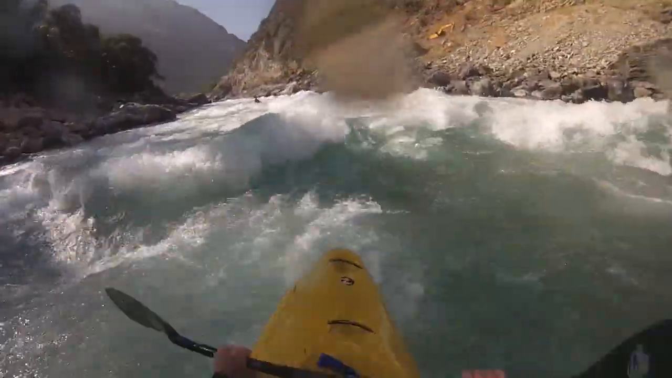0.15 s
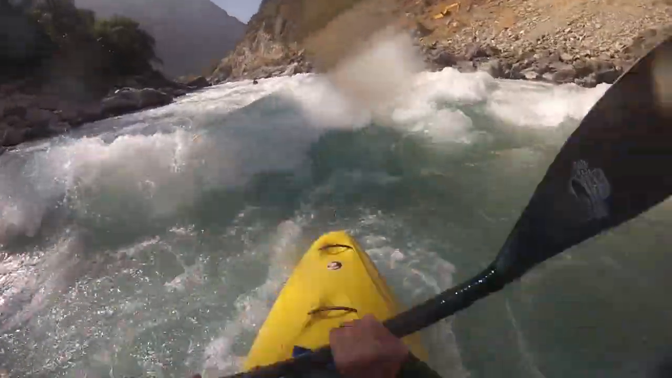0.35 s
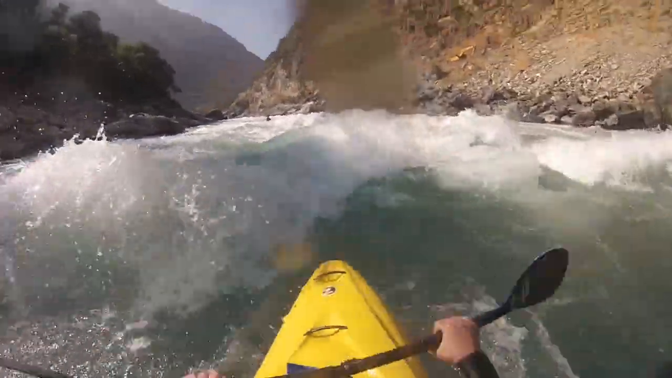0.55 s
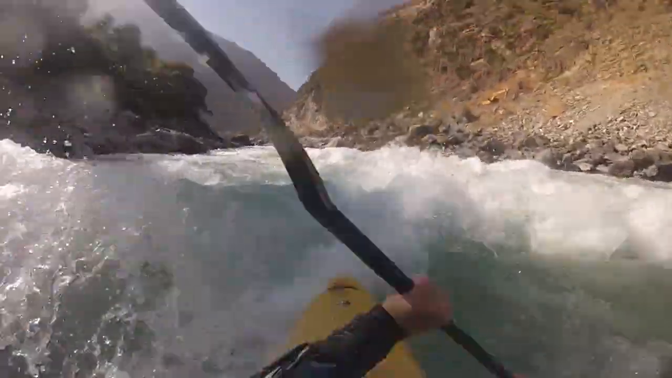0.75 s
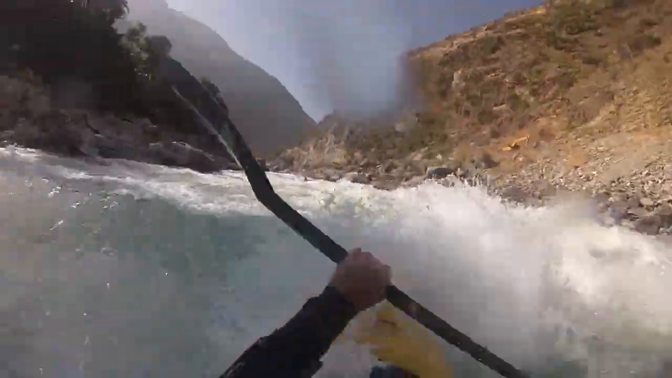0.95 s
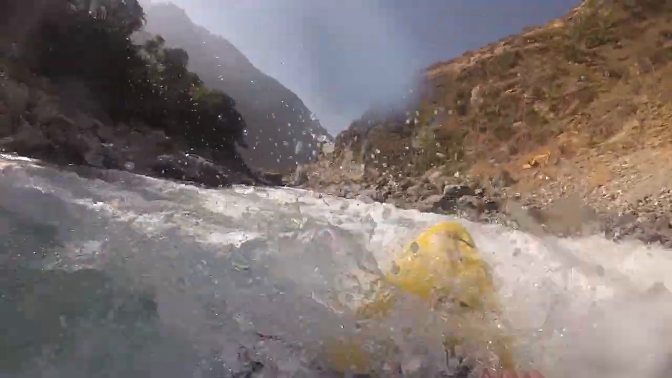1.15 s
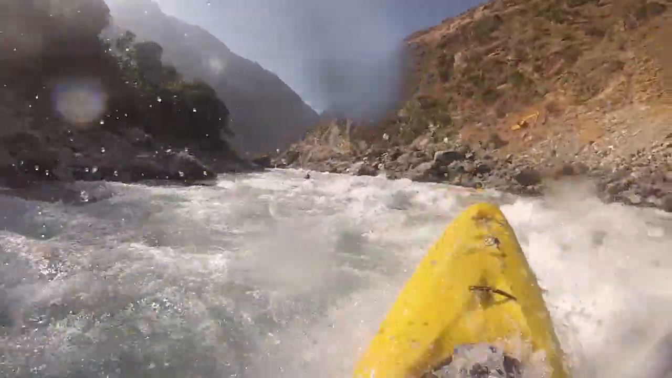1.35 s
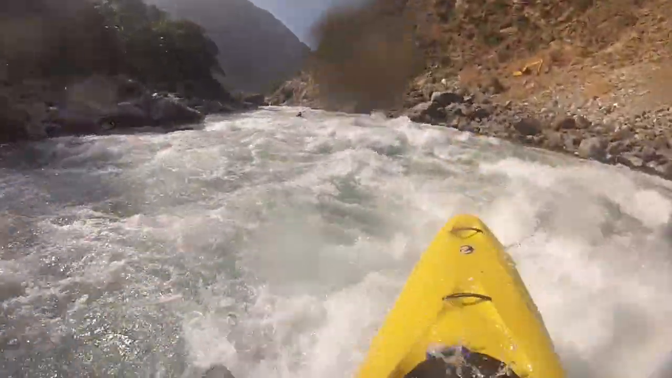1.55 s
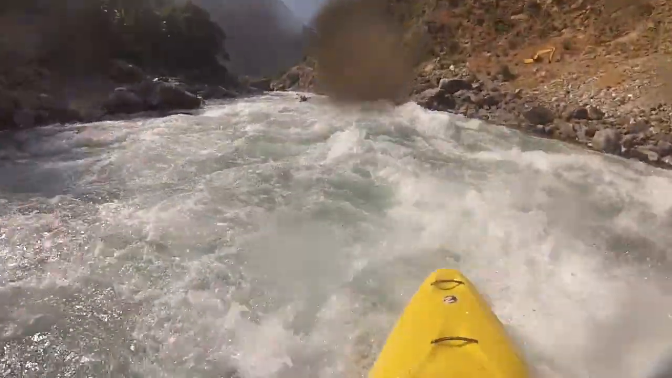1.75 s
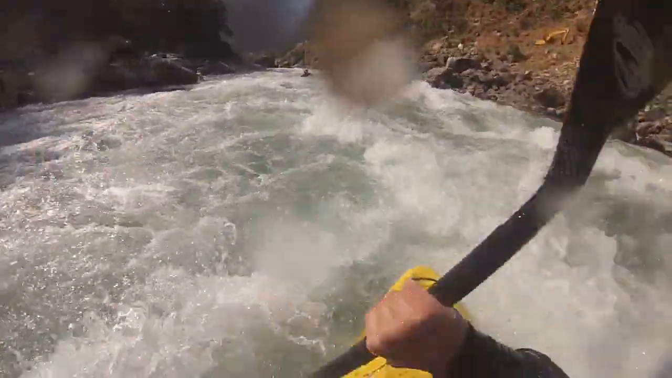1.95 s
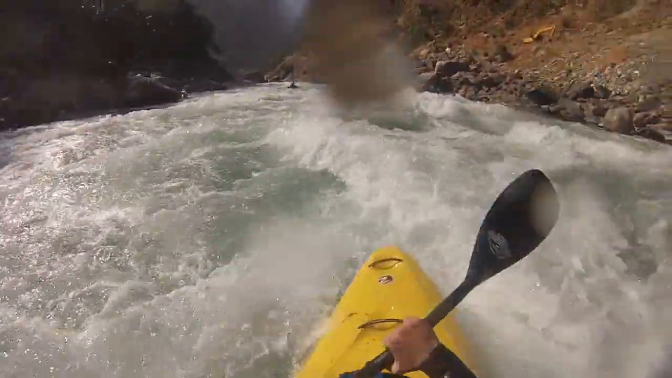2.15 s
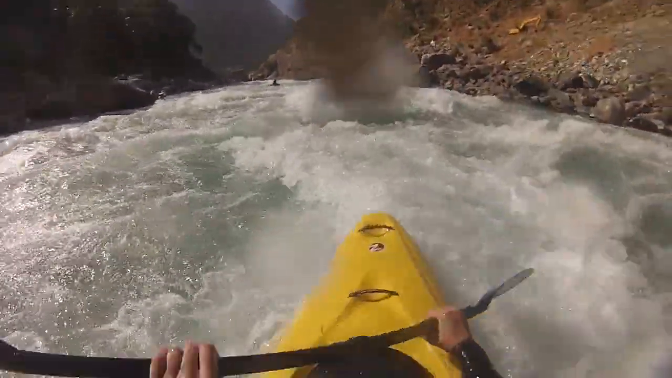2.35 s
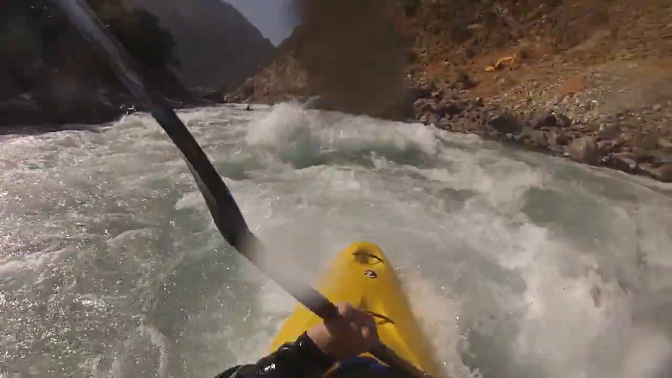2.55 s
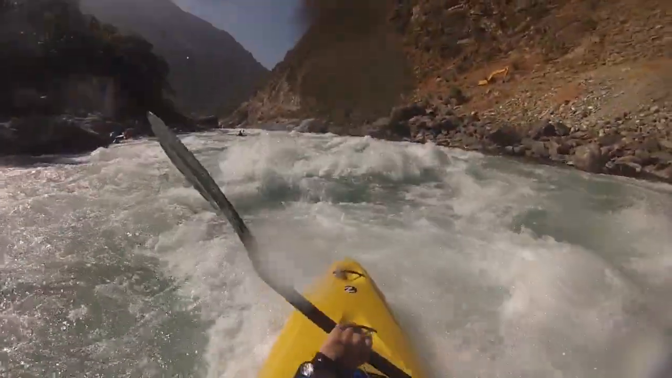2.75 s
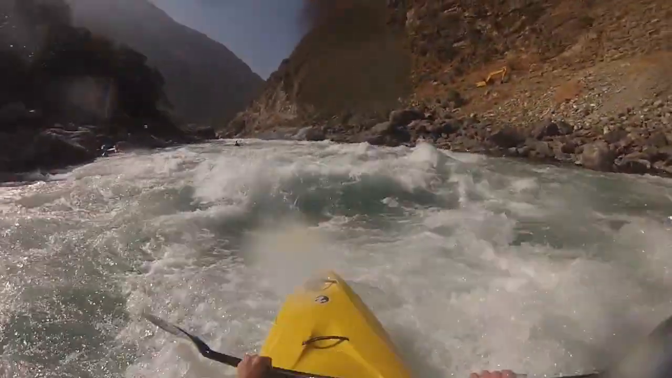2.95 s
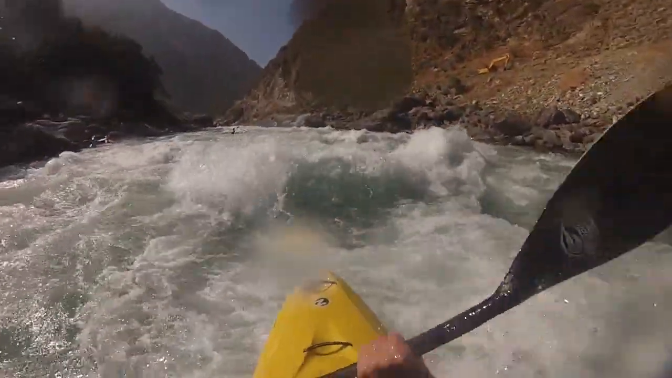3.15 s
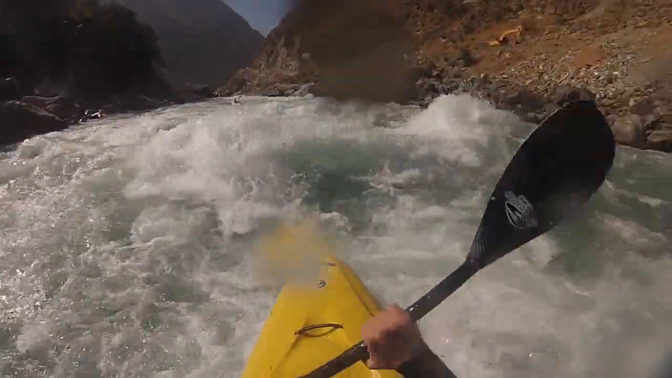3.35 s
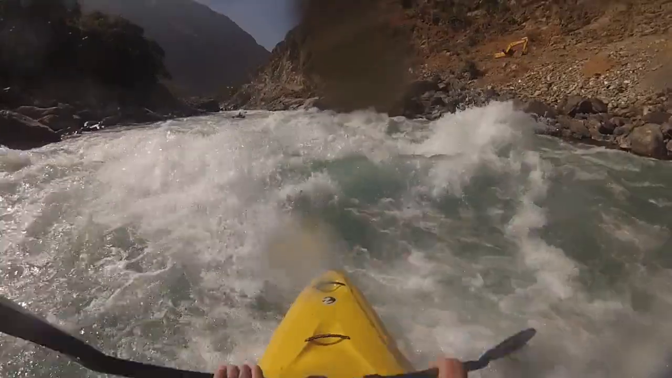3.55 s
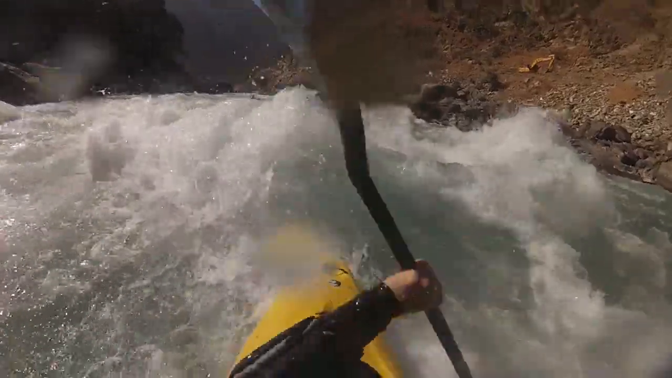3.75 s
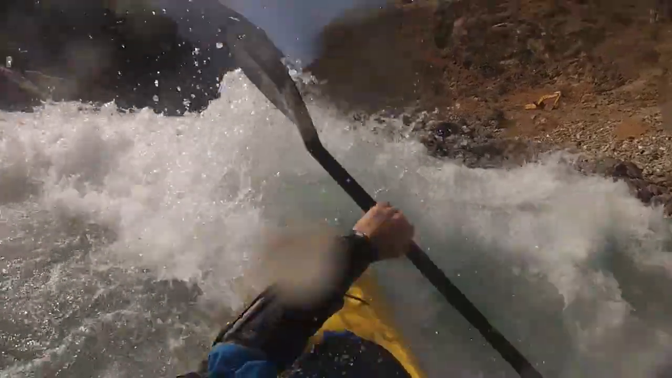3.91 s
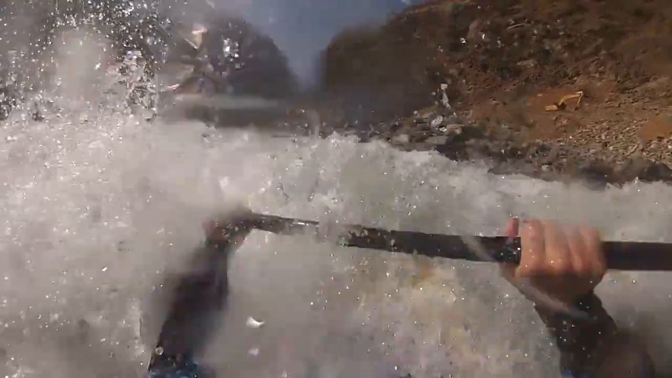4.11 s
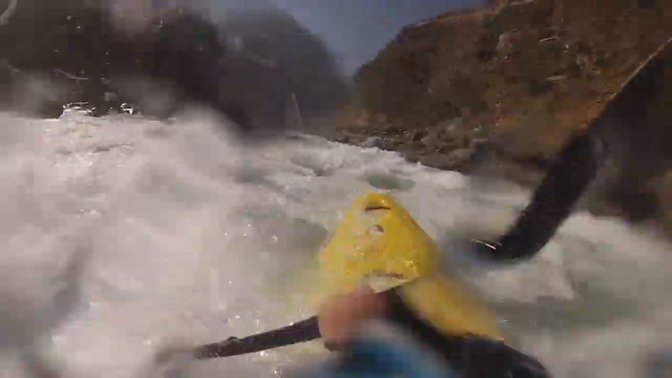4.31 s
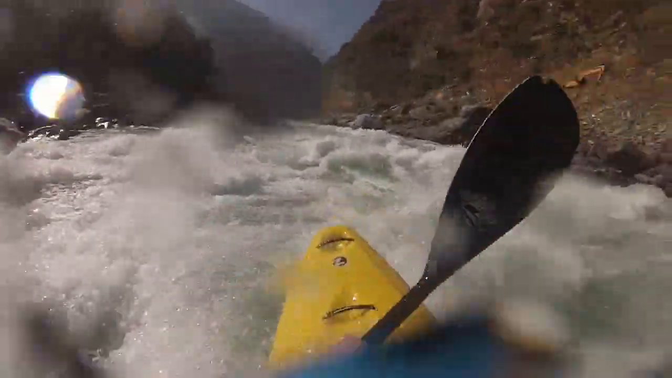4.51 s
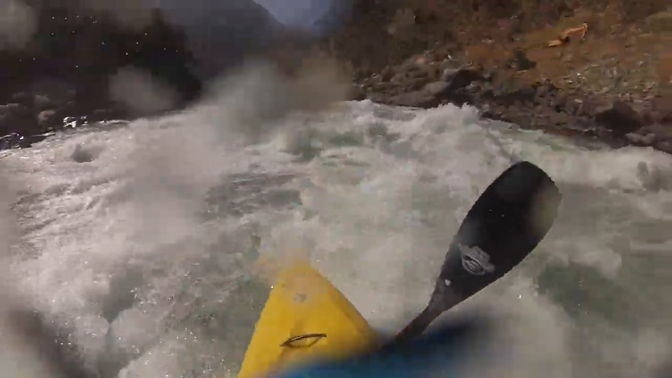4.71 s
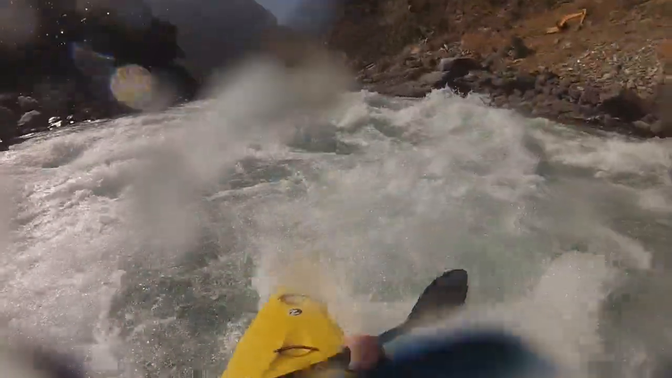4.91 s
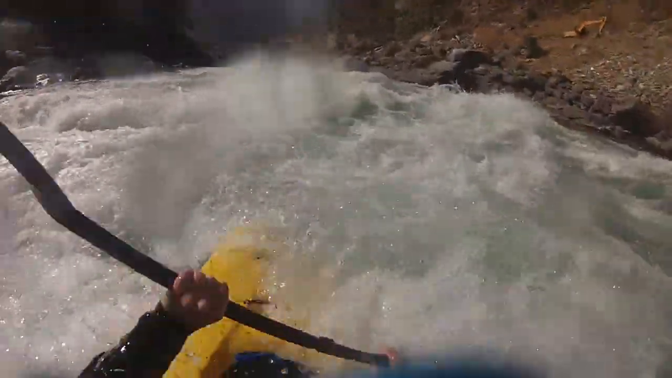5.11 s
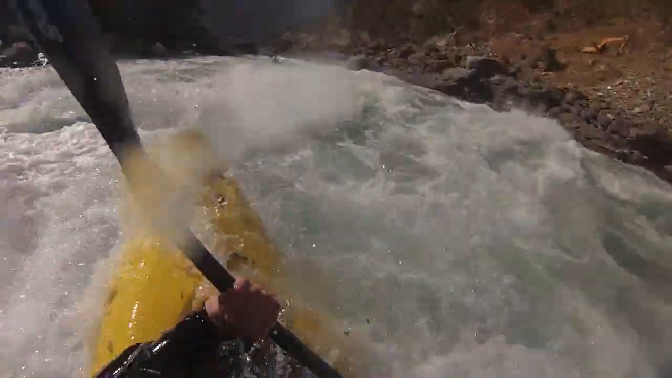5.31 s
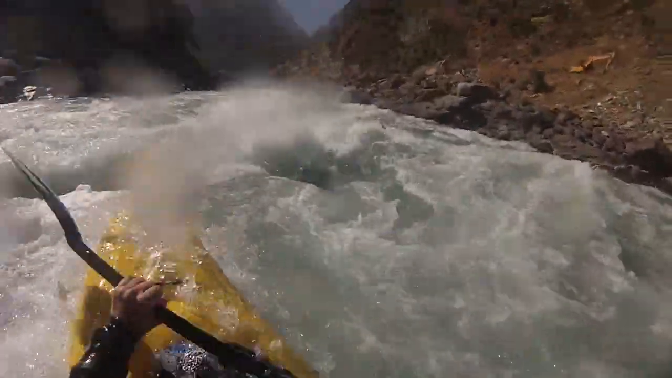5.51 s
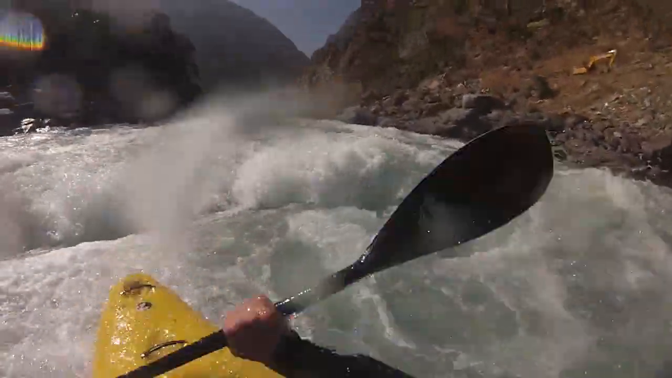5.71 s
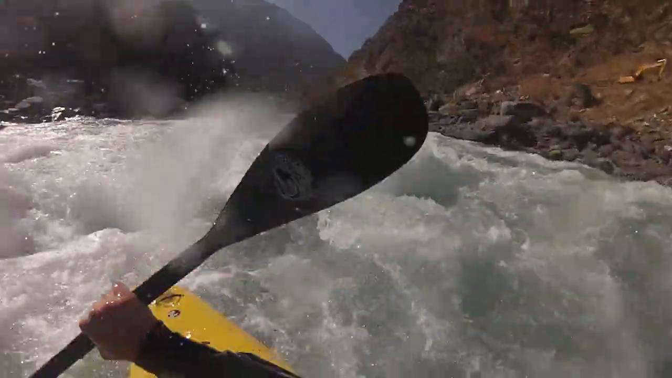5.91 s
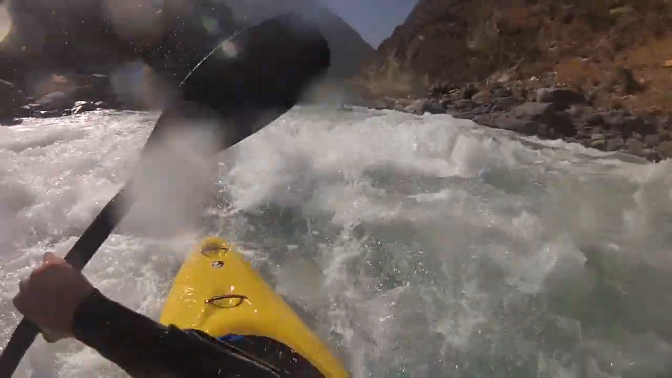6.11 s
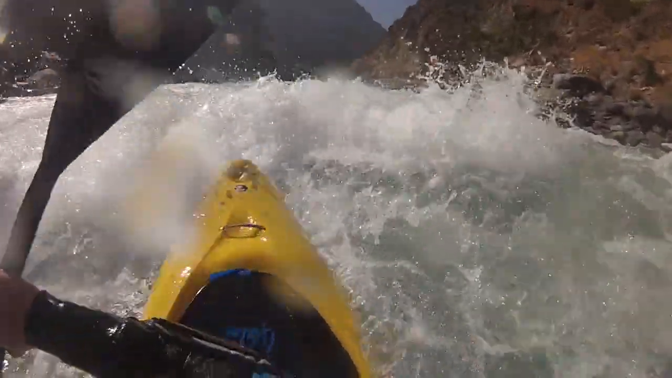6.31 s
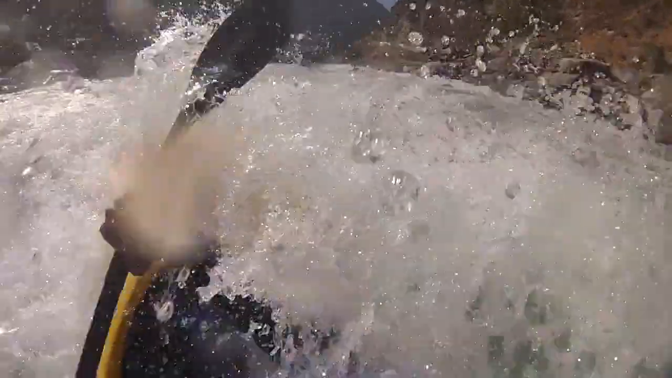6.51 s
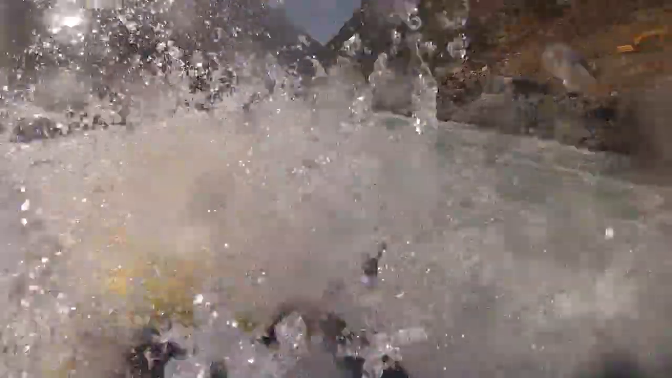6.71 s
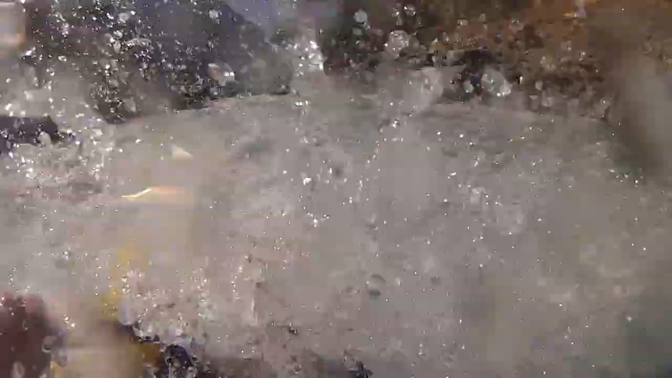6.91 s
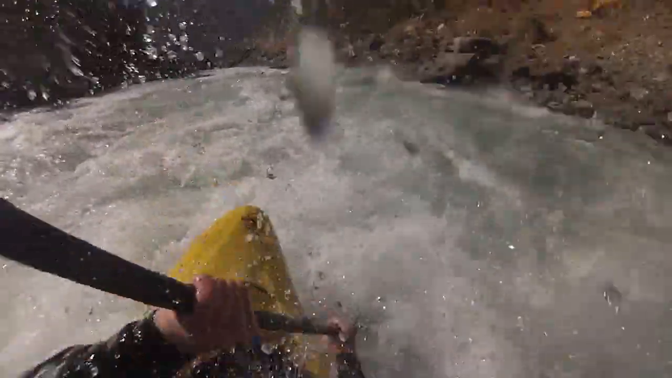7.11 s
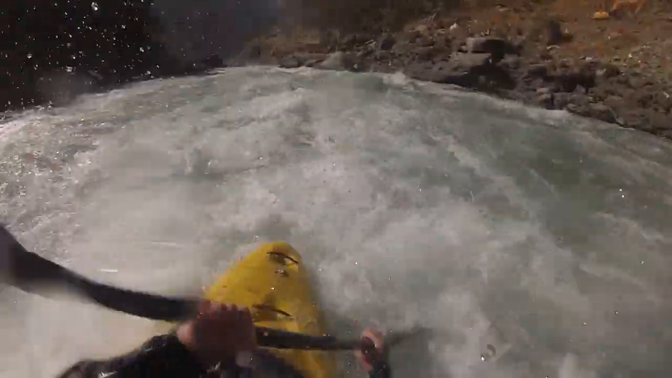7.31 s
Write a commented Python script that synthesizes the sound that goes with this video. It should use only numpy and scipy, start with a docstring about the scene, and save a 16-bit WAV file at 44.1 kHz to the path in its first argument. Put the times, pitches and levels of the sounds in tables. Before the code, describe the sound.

Whitewater in a gorge, heard inside a small plastic waterproof housing on a kayaker, so the river sounds boxy and coloured by the shell, alike in both channels. A continuous bubbly rush swells at about 0.6 seconds, then foam hisses and low buffeting pushes around 0.8-1.1, with a few drops ticking and soft thuds at 1.1 and 1.3. The wake gurgles and the river settles through 2-3 seconds, swelling mildly near 3.5, with a light tap at 3.7. The roar builds strongly to 4.25, where a quick cluster of sharp cracks, spray patter and thumps strikes at 4.15-4.4. Gurgling fades through 5-6 with sparse faint drops. Another wave rises to the hardest smack at 6.6, with deep thumps, followed by isolated drops and a second crisp burst at 7.02-7.05. Foamy rush and wake continue, with one last tick at 7.3.

```python
"""A whitewater river roars and fizzes, swelling as each wave nears and gurgling in its wake; spray patters,
big drops crack and slabs of water thump: a kayak in a gorge, heard inside a small waterproof camera housing.
The river is noise, bubbles and clicks, coloured by the plastic shell and swelled wave by wave.
Drops and spray strike a set of decaying shell resonances; thumps are low sines that die away quickly.
Low noise pushes on the housing in lumps."""
import sys
import numpy as np
from scipy import signal
from scipy.fft import rfft, irfft
from scipy.io import wavfile

SR = 44100
rng = np.random.default_rng(int(sys.argv[2]) if len(sys.argv) > 2 else 0)


def dump(signal):
    """Clip the signal to [-1, 1] and save it as 16-bit WAV at the path in sys.argv[1]."""
    limited = np.clip(np.atleast_2d(signal).T, -1, 1)
    pcm = np.round(limited * 32767).astype(np.int16)
    wavfile.write(sys.argv[1], SR, pcm)


N = 328986

# waves that the boat rides through: crest t/s, approach time/s, roar level/dB, foam level/dB,
# push on the housing level/dB, gurgle of the wake level/dB, fading time of the wake/s
WAVES = [(0.58, 0.089, -57.5, -61, -64, -79, 0.3), (0.83, 0.28, -71, -58.5, -53, -76, 0.3),
         (1.05, 0.35, -73, -58, -64, -52.5, 0.21), (1.32, 0.14, -63, -76, -56.5, -57, 1),
         (1.98, 0.89, -67, -77, -69, -62, 0.14), (2.282, 0.1, -66, -66, -62, -64.5, 0.76),
         (3.48, 0.37, -62.5, -64.5, -82, -79, 0.38), (4.25, 0.34, -52, -54.5, -50.5, -55.5, 0.92),
         (5.28, 0.14, -65, -71, -64, -61, 0.36), (5.95, 0.5, -67, -78, -59, -67, 0.99),
         (6.521, 0.46, -55.5, -61.5, -58, -55.5, 0.91), (7.05, 0.17, -55, -72, -53, -73, 0.65)]
# resonances of the struck shell: f/Hz, level/dB, time to fall by 60 dB/s
SHELL_RINGS = [(1075, 3, 0.0045), (1455, 1.5, 0.0088), (1710, 3, 0.0082), (2050, -3.5, 0.032),
               (2270, -7, 0.023), (2900, 7, 0.0042), (3550, -2, 0.013), (4100, 1.5, 0.0031),
               (6400, -33, 0.0059), (7100, -13, 0.0023), (9260, -41, 0.0027)]
# sheets of spray sweeping over the shell: arrival t/s, level of the pelting at the thickest/dB,
# time until the thickest/s
SPRAY_SHEETS = [(1.05, -60, 0.062), (4.111, -46.5, 0.034), (4.179, -44, 0.014), (4.228, -50, 0.02),
                (6.4, -60, 0.023), (6.575, -38.5, 0.02), (6.666, -47, 0.013), (7.018, -36.5, 0.0043),
                (7.036, -39, 0.011), (7.174, -61, 0.018)]
# a push on the housing comes and goes; a crest falls behind quickly
PUSH_RISE_S, PASS_S = 0.17, 0.11


def from_db(db):
    """Turns decibels into an amplitude factor."""
    return 10 ** (np.asarray(db) / 20)


def rms_one(x):
    """Scales a signal to an rms of 1."""
    return x / np.sqrt(np.mean(x ** 2) + 1e-20)


def drift(rate_hz):
    """Slow random wander with an rms of 1: noise that loses its power above the rate."""
    hz = np.arange(N // 2 + 1) * SR / N
    spectrum = rfft(rng.standard_normal(N)) / (1 + (hz / rate_hz) ** 2)
    return rms_one(irfft(spectrum, N))


def band(x, low_hz, high_hz, order=2):
    """Causal band-pass."""
    edges_hz = [low_hz, min(high_hz, SR / 2 - 1000)]
    sos = signal.butter(order, edges_hz, "band", fs=SR, output="sos")
    return signal.sosfilt(sos, x + 1e-18)


def ring(force, hz, t60):
    """Resonance: a unit click sets off a decaying sine that starts from height 1."""
    radius = np.exp(-np.log(1000) / (t60 * SR))
    angle = 2 * np.pi * hz / SR
    return signal.lfilter([0, np.sin(angle)], [1, -2 * radius * np.cos(angle), radius ** 2], force + 1e-18)


def struck_shell(force):
    """The whole shell rings: a force drives all its resonances, neighbours in opposite polarity."""
    return sum(from_db(db) * (-1) ** k * ring(force, hz, t60)
               for k, (hz, db, t60) in enumerate(SHELL_RINGS))


def through_shell(x, colour):
    """Gives a sound its colour, lifted where the plastic shell resonates; rms 1."""
    # bands that the shell lets through best: centre f/Hz, width/Hz, lift/dB
    windows = [(1700, 510, 3), (3000, 880, 6), (4214, 730, 10), (7160, 140, 2), (8270, 370, 3.5)]
    hz = np.arange(N // 2 + 1) * SR / N + 1e-3
    points_hz, points_db = np.transpose(colour)
    level_db = np.interp(np.log(hz), np.log(points_hz), points_db)
    for centre_hz, width_hz, lift_db in windows:
        level_db = level_db + lift_db / (1 + (2 * (hz - centre_hz) / width_hz) ** 2)
    return rms_one(irfft(rfft(x) * from_db(level_db), N))


def grains(per_s, spread_db):
    """Random clicks of either polarity and uneven size; rms 1."""
    sizes = from_db(spread_db * np.minimum(rng.exponential(1, N), 4))
    polarity = rng.choice([-1, 1], N)
    falls = rng.random(N) < per_s / SR
    return rms_one(sizes * polarity * falls)


def bubbles(per_s, low_hz, high_hz, cycles, count=16):
    """Air pockets of many sizes, each ringing for a few cycles; rms 1."""
    born = grains(per_s, spread_db=-1.0)
    size_class = rng.integers(0, count, N)
    pitches_hz = np.geomspace(low_hz, high_hz, count)
    return rms_one(sum(np.sqrt(hz) * ring(born * (size_class == k), hz, cycles / hz)
                       for k, hz in enumerate(pitches_hz)))


def swells(level_db, before_s, after_s):
    """Gain that rises toward each crest and sinks behind it; the waves add in power."""
    t = np.linspace(0, N / SR, 3000)
    past_s = t[:, None] - np.array(WAVES)[:, 0]
    away = np.abs(past_s / np.where(past_s < 0, before_s, after_s))
    gains = from_db(level_db) * np.exp(-away ** 0.9)
    return np.interp(np.arange(N) / SR, t, np.linalg.norm(gains, axis=1))


def together(*gains):
    """Unrelated sounds add in power."""
    return np.sqrt(sum(gain ** 2 for gain in gains))


def river():
    """Countless far bubbles merge into a roar; crests roar and fizz as they near, wakes gurgle."""
    # colour of each layer: f/Hz, level/dB
    churn_colour = [(50, -15.5), (110, -1), (170, 3), (230, 2), (300, 3), (450, 0), (700, -4.5),
                    (1200, -25), (3000, -23)]
    gurgle_colour = [(300, -41), (700, -18), (950, -7), (1200, 0), (1500, -0.5), (1800, -8.5), (2200, -5.5),
                     (2800, -11), (6000, -41)]
    roar_colour = [(400, -20), (900, -6), (1400, -9.5), (1700, -0.5), (2100, -7), (2500, -10.5), (3100, -8),
                   (3600, -15.5), (4300, -19), (5000, -17), (8000, -23), (16000, -63)]
    foam_colour = [(1000, -23.5), (2500, -1), (4000, 0.5), (5000, -2), (6200, 1.5), (8000, -3.5),
                   (10000, -2), (11800, -7.5), (13500, -3), (16000, -24)]
    _, approach_s, roar_db, foam_db, push_db, wake_db, wake_s = np.transpose(WAVES)

    # a wake builds up as the bow digs in; it also churns, roars and fizzes, below its gurgle
    wake = swells(wake_db, 0.29, wake_s)
    # the push of a wave churns too, 9 dB below the push itself
    push_churn = swells(push_db - 9, PUSH_RISE_S, PASS_S)
    # the first level of each layer is the river between waves
    churn_gain = together(from_db(-66), push_churn, from_db(-9) * wake)
    gurgle_gain = together(from_db(-66.5), wake)
    roar_gain = together(from_db(-60), swells(roar_db, approach_s, PASS_S), from_db(-5) * wake)
    foam_gain = together(from_db(-71.5), swells(foam_db, approach_s, PASS_S), from_db(-5) * wake)

    churn_flutter = from_db(1.7 * drift(rate_hz=15))
    churn = churn_gain * churn_flutter * through_shell(rng.standard_normal(N), churn_colour)

    boiling = rng.standard_normal(N) + from_db(1.0) * bubbles(per_s=1500, low_hz=736, high_hz=2410, cycles=19.5)
    gurgle_flutter = from_db(1.13 * drift(rate_hz=8.3))
    gurgle = gurgle_gain * gurgle_flutter * through_shell(boiling, gurgle_colour)

    turbulence = drift(rate_hz=66)   # roar and foam flutter as one
    roar = roar_gain * from_db(0.25 * turbulence) * through_shell(rng.standard_normal(N), roar_colour)

    bursting = rng.standard_normal(N) + from_db(-1.5) * grains(per_s=4400, spread_db=4.5)
    foam = foam_gain * from_db(0.26 * turbulence) * through_shell(bursting, foam_colour)
    return churn + gurgle + roar + foam


def drops(rows, size=4096):
    """Each drop lands with a sharp push, then flattens and tears; the shell and the spot hit ring."""
    out, t = np.zeros(N + size), np.arange(size) / SR
    push = 1. * (t == 0)
    knock = band(push, 71, 2000, order=1)
    for s, level_db, flatten_s, spot_hz, spot_db, splatter_db in rows:
        flattening = rng.standard_normal(size) * np.exp(-t / flatten_s)
        shell = struck_shell(push + 0.39 * flattening)
        # a drop that takes longer to flatten drives its spot for longer
        spot_rise = 1 - np.exp(-t / (0.16 * flatten_s))
        spot_decay = np.exp(-t / (0.00081 + 0.31 * flatten_s))
        spot = np.sin(2 * np.pi * spot_hz * t) * spot_rise * spot_decay
        tearing = rng.standard_normal(size) * np.exp(-t / (flatten_s + 0.00078))
        splatter = band(tearing, 3000, 11700)
        at = int(s * SR)
        for part_db, part in [(0, shell), (spot_db, spot), (-7, knock), (splatter_db, splatter)]:
            out[at:at + size] += from_db(level_db + part_db - 3.0) * part / np.abs(part).max()
    return out[:N]


def big_drops():
    """Big drops crack against the shell one by one."""
    # big drops: t/s, level (3 dB above the peak of the shell's ring)/dB, time to flatten/s,
    # pitch of the spot hit f/Hz, ring of that spot against the shell/dB, splatter against the shell/dB
    big_hits = [(1.0741, -35, 0.0011, 2280, 2.5, -6), (1.1128, -35.5, 0.00093, 2100, -8, -6),
                (1.329, -29.5, 0.000081, 2050, 10, -5), (1.5094, -42.5, 0.00033, 2900, 10.5, -13),
                (3.7109, -37.5, 0.0011, 2300, 4.5, -3), (3.977, -40, 0.00077, 2850, 5, 6),
                (4.1505, -32, 0.00087, 2000, -7, -12), (4.1572, -26, 0.0014, 2800, -1, -6),
                (4.168, -18.5, 0.000076, 4080, -1, -5), (4.1818, -25, 0.00014, 2160, -12, -1.5),
                (4.229, -18.5, 0.0015, 2890, 9.5, -29), (4.2313, -28, 0.0013, 2050, 16, -18),
                (4.1914, -37, 0.001, 2720, 2, -18), (4.2402, -25, 0.001, 2760, 0, -10),
                (4.256, -40.5, 0.00075, 1670, 18.5, -23), (4.328, -33.5, 0.0011, 1750, -1, -5),
                (4.3708, -34, 0.0008, 2450, -4, -11), (5.785, -44.5, 0.013, 4000, -11, 0.5),
                (5.987, -37, 0.00019, 2400, -7, -24), (6.4703, -36, 0.001, 1900, 2, -21),
                (6.5823, -20.5, 0.0007, 2760, -2.5, -20), (6.5925, -13.5, 0.0013, 4100, 4, 2.5),
                (6.602, -13, 0.0029, 2460, 2, -5.5), (6.6245, -20, 0.0013, 1700, -5, -18),
                (6.644, -31, 0.0011, 1420, 9.5, -9), (6.653, -25.5, 0.0013, 1700, -2, -4.5),
                (6.6722, -30, 0.00058, 3870, 0, 0), (6.9161, -34, 0.0013, 2750, 0, -8),
                (6.9614, -28, 0.00017, 2400, -27, -16), (7.0182, -18, 0.0026, 3000, 12.5, 3.5),
                (7.0212, -31.5, 0.0049, 5420, 7, 0), (7.0462, -22, 0.0052, 2690, -2, -21),
                (7.0502, -20, 0.0039, 1700, 2, -28), (7.311, -37, 0.00067, 2900, 7, -16)]
    return drops(big_hits)


def stray_drops(count=4):
    """Each sheet of spray carries some larger drops, which land at random times around its thickest."""
    rows = []
    for s, sheet_db, rise_s in SPRAY_SHEETS:
        for when, lightness, spot in np.clip(rng.standard_normal((count, 3)), -2, 2):
            delay_s = rise_s * 2 ** (0.7 * when)   # scatter in octaves
            lands_s = min(s + delay_s, (N - 1) / SR)
            level_db = sheet_db + 10.5 - 3.5 * lightness
            spot_hz = 2350 * 2 ** (0.433 * spot)   # spread in octaves
            # flattening in 0.001 s, spot ring 6.5 dB, splatter -4 dB
            rows.append((lands_s, level_db, 0.001, spot_hz, 6.5, -4))
    return drops(rows)


def spray():
    """Sheets of fine droplets patter on the same shell: each thickens quickly and thins out slowly."""
    level = np.zeros(N)
    for s, level_db, rise_s in SPRAY_SHEETS:
        age = np.clip((np.arange(N) / SR - s) / rise_s, 0, 40)
        level = np.hypot(level, from_db(level_db) * age * np.exp(1 - age))
    patter = level * grains(per_s=1400, spread_db=4.0)
    shell = rms_one(struck_shell(patter))
    sizzle = rms_one(band(patter, 5000, 7900, order=1))
    drumming = rms_one(band(patter, 102, 340))
    return np.std(patter) * (shell + from_db(-10.5) * sizzle + from_db(-3.5) * drumming)


def thumps(size=16384):
    """A slab of water, a heavy, soft push, makes the housing bob on its mount for a few cycles. Some rows are
    instead the low knocks of big drops, which set the housing bobbing the same way."""
    # slabs of water, and the low knocks of some big drops: t/s, starting level before the band-pass/dB, bobbing
    # f/Hz
    slabs = [(1.063, -32, 89), (1.113, -38.5, 106), (1.3308, -45, 173), (3.101, -51, 94), (3.71, -50, 42),
             (5.33, -49, 41.3), (4.142, -38, 134), (4.16, -32, 222), (4.226, -38, 115), (6.5926, -26, 304),
             (6.593, -30.5, 111), (6.622, -26, 121), (6.6427, -19.5, 103), (6.6423, -26, 195),
             (7.0194, -31, 149), (7.031, -23.5, 76)]
    cycles = 10   # until a bob has fallen by 60 dB
    out, t = np.zeros(N + size), np.arange(size) / SR
    for s, level_db, hz in slabs:
        at = int(s * SR)
        decay = np.exp(-np.log(1000) * t * hz / cycles)
        out[at:at + size] += from_db(level_db) * np.sin(2 * np.pi * hz * t) * decay
    return band(out[:N], 68, 1400)


def buffeting():
    """Lumpy low pressure on the housing, strongest as a wave pushes past."""
    # colour of the rumble: f/Hz, level/dB
    rumble_colour = [(15, 4), (28, 3.5), (42, -4), (62, -7), (95, 0), (140, -17), (300, -39.5)]
    push_db = np.array(WAVES)[:, 4]
    gain = together(from_db(-69.5), swells(push_db, PUSH_RISE_S, 0.19))
    lumps = from_db(0.74 * drift(rate_hz=3.8))
    return gain * lumps * through_shell(rng.standard_normal(N), rumble_colour)


def scene():
    """Everything reaches one microphone inside the housing, so both channels are alike."""
    inside = river() + big_drops() + stray_drops() + spray() + thumps() + buffeting()
    return np.stack([inside, inside])


def record(dry):
    """The deepest bass and the top are cut, the top steeply."""
    bass_cut = signal.butter(2, 18, "high", fs=SR, output="sos")
    top_cut = signal.ellip(10, .2, 80, 15350, fs=SR, output="sos")   # ripple dB, depth dB, edge Hz
    return signal.sosfilt(top_cut, signal.sosfilt(bass_cut, dry))


dry = scene()
out = record(dry)
dump(out)
```